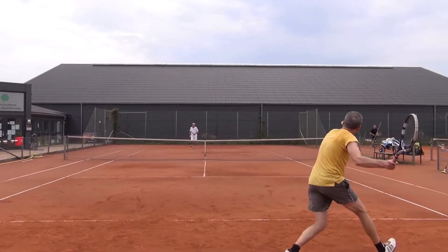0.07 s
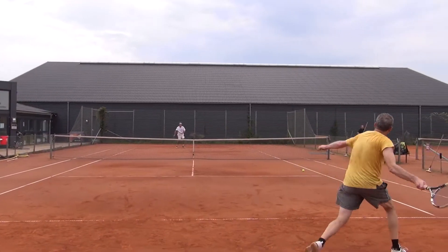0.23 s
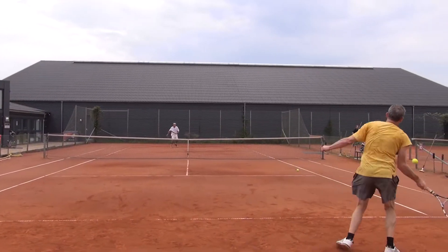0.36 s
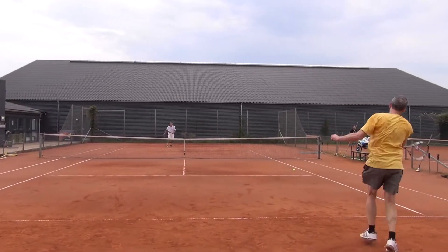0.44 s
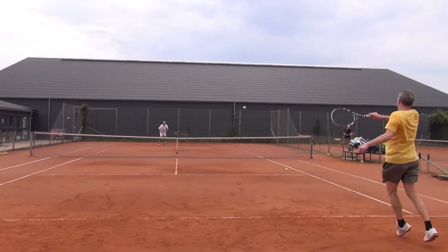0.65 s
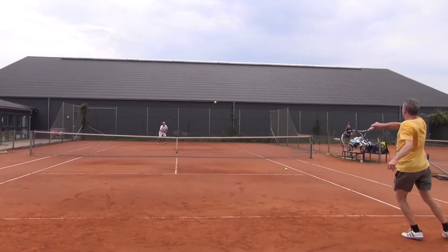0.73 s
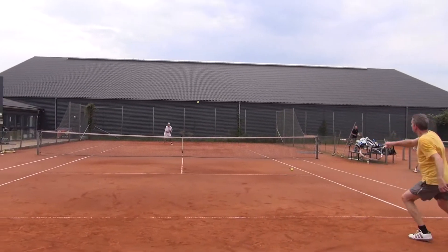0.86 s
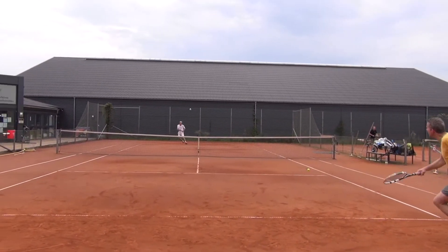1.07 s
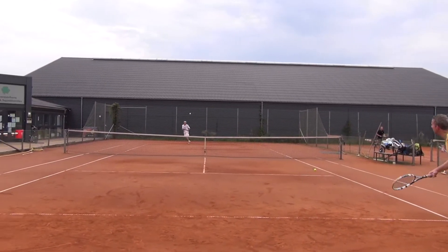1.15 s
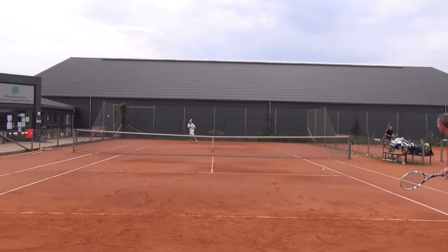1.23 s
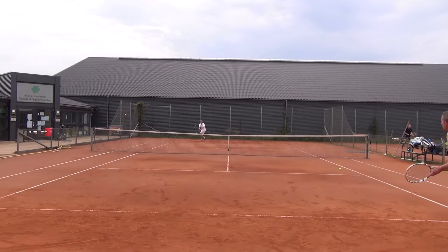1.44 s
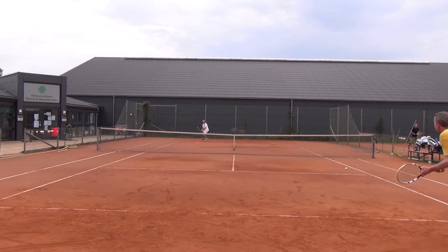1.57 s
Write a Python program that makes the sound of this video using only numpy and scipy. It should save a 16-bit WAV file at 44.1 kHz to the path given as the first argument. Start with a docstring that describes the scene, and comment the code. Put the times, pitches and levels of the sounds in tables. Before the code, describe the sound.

A tennis ball is hit with a sharp close racket pop, shoes sliding on clay, then fainter pops

```python
"""Sharp tennis-ball pops, one close by and others weaker, over thuds, gritty slides and a soft outdoor wash.
Each pop sums a noise crack, a thump, racket modes and, a moment later, the ball's air modes.
Shoes and ball knock on the clay as short hollow tones; slides are dense random grains of fine and coarse grit.
Fences and buildings scatter all of these back as a decaying tail. The image is almost mono."""
import sys
import numpy as np
from scipy import signal
from scipy.fft import rfft, irfft
from scipy.io import wavfile
from scipy.ndimage import uniform_filter1d

SR = 44100
rng = np.random.default_rng(int(sys.argv[2]) if len(sys.argv) > 2 else 0)


def master_out(mix):
    """Clip the mix to full scale and print it as 16-bit PCM to the path in sys.argv[1]."""
    frames = np.transpose(np.atleast_2d(mix))
    ceiling = np.clip(frames, -1, 1)
    pcm = np.round(ceiling * 32767).astype(np.int16)
    wavfile.write(sys.argv[1], SR, pcm)


N = 70560  # samples, 1.6 s


def gain_of(db):
    """Converts decibels to an amplitude ratio by the 20 log law."""
    return 10 ** (np.asarray(db) / 20)


def evened(x):
    """Normalises signal power: scales to rms 1."""
    return x / np.sqrt(np.mean(x ** 2) + 1e-20)


def read(points, hz):
    """Interpolates a table along log frequency, roughly the ear's own pitch scale."""
    f, value = np.transpose(points)
    return np.interp(np.log(hz + 1), np.log(f + 1), value)


def coloured(x, points):
    """Linear filtering: multiplies the spectrum by a table of dB over frequency, leaving phase alone."""
    hz = np.fft.rfftfreq(len(x), 1 / SR)
    return irfft(rfft(x) * gain_of(read(points, hz)), len(x))


def add(mix, start_s, sound):
    """Superposition: adds a sound into the mix at its start time."""
    part = mix[round(start_s * SR):][:len(sound)]
    part += sound[:len(part)]


def wash():
    """Distant traffic and air: many incoherent sources add up to noise, here with drifting spectral patches."""
    # spectrum of the wash: hz, relative density_db (per Hz)
    wash_spectrum = [(24, -38), (40, 4), (256, -2.5), (345, -4.5), (516, -4.5), (733, -1.5), (1070, -5),
                     (1810, -10), (2000, -10.5), (2840, -13.5), (4130, -16), (4460, -16.5), (16000, -31)]
    level_db, patch_db = -42, 2.0  # rms of the wash, rms of its patches
    frames, hz = N // 256 + 5, np.fft.rfftfreq(1024, 1 / SR)
    real, imaginary, patches = rng.standard_normal((frames, 513, 3)).T
    # smoothed over frequency, then over time
    patches = uniform_filter1d(patches, size=12, axis=0)
    patches = evened(uniform_filter1d(patches, size=12, axis=1))
    density_db = read(wash_spectrum, hz)[:, None] + patch_db * patches
    spectrum = (real + 1j * imaginary) * gain_of(density_db)
    noise = signal.istft(spectrum, nperseg=1024, noverlap=768)[1][:N]
    return gain_of(level_db) * evened(noise)


def bloom(t, hz, width_s):
    """A mode driven by a brief contact: it swells, peaks at twice the width, then dies exponentially."""
    u = t / width_s
    return (u / 2) ** 2 * np.exp(2 - u) * np.sin(2 * np.pi * hz * t)


def crack(t, t60_s):
    """Impact noise: an abrupt contact excites a broad band, which rises fast and decays exponentially."""
    # spectrum of the contact noise: hz, relative density_db (per Hz)
    crack_spectrum = [(500, -52), (1200, 8), (1700, 4), (2500, -17), (3000, 9.5), (3700, -7), (4300, 1),
                      (5100, -22), (6000, -2.5), (6900, -15), (7900, -5), (9800, -7), (11000, -17),
                      (14000, -20), (16000, -23)]
    rise_s = .0009
    noise = evened(coloured(rng.standard_normal(len(t)), crack_spectrum))
    rise = (1 - np.exp(-t / rise_s)) ** 2
    return noise * rise * gain_of(-60 * t / t60_s)


def knock(level_db, hz, width_s, thud_hz, thud_db, tick_db):
    """A soft impact on clay: damped modes give a hollow note over a lower thud, contact noise a tick."""
    t = np.arange(round(.15 * SR)) / SR
    note = bloom(t, hz, width_s)
    thud = gain_of(thud_db) * bloom(t, thud_hz, 0.66 * width_s)
    tick = gain_of(tick_db) * crack(t, t60_s=.014)
    return gain_of(level_db) * (note + thud + tick)


def slides():
    """Granular friction: a sliding shoe gives dense, clumped grains of uneven size, from fine to coarse grit."""
    # one table for each slide: time_s, level_db, dullness (0 fine grit, 1 coarse grit)
    slide_paths = [
        [(.187, -76, .2), (.191, -43, 0), (.215, -45.5, 0), (.22, -35.5, 0.01), (.236, -44, 0.3),
         (.245, -30.5, 0.3), (.255, -43.5, 0), (.278, -32.5, 0.06), (.309, -39, 0.16), (.322, -33.5, 0.05),
         (.408, -32.5, 0.13), (.418, -38, 0.3), (.428, -33, 0.7), (.441, -47.5, 0.27), (.47, -34.5, 0),
         (.53, -38.5, 0.9), (.57, -41.5, 0.54)],
        [(.72, -47, .5), (.758, -39, 0.4), (.816, -48, 0.44), (.836, -46, 0.78), (.841, -34, 0),
         (.87, -30.5, 0.43), (.89, -41, 0.48), (.91, -34, 0.78), (.94, -39.5, 0.67), (.99, -46, .8),
         (1.002, -41, .5), (1.014, -40, 0.83), (1.045, -78, 0.6)],
        [(1.05, -75, 0.8), (1.14, -49, 0.75), (1.2, -58, 1), (1.209, -43, 0.15), (1.273, -43, 0.33),
         (1.322, -48, 0.4), (1.35, -49, 0.9), (1.366, -42, 1), (1.4, -54, 0.7), (1.445, -58, 0.8),
         (1.461, -41.5, 0.84), (1.488, -47, 0.3), (1.501, -31.5, 0.73), (1.516, -40, 1), (1.521, -43.5, 0.9),
         (1.545, -44, 0.5), (1.57, -57, 1), (1.6, -51, 1)],
    ]
    # gain reached at 11.5 kHz and above, one for each slide: gain_db
    slide_air_db = [-1, -8, -6.5]
    # spectra of fine and coarse grit: hz, relative density_db (per Hz)
    fine_spectrum = [(59, -49), (100, -6), (239, -26), (308, -9), (481, -42), (676, 3), (854, -7.5),
                     (2080, -3), (2420, -7), (3400, -2), (4570, -13), (5080, -3), (7450, -10.5),
                     (12400, -7.5), (16000, -17.5)]
    coarse_spectrum = [(60, -40), (100, -11.5), (400, -3.5), (660, 0), (1480, 0.5), (3000, -5.5),
                       (5000, -5.5), (7600, -30), (8800, -13), (9300, -10), (9800, -29), (12000, -42),
                       (16000, -34)]
    grains_per_s, spread_db = 18000, 1.6
    clump_s, clump_db = .003, .8

    t, out = np.arange(N) / SR, np.zeros(N)
    clumps = evened(uniform_filter1d(rng.standard_normal((2, N)), size=round(clump_s * SR)))
    unevenness = np.minimum(rng.exponential(1, (2, N)), 5)
    size = gain_of(spread_db * unevenness + clump_db * clumps)
    struck = rng.random((2, N)) < grains_per_s / SR
    grains = size * struck * rng.standard_normal((2, N))

    # both grits are brought to equal strength in this band
    band = signal.butter(2, [2500, 12000], "bandpass", fs=SR, output="sos")
    fine = coloured(grains[0], fine_spectrum)
    fine = fine / np.std(signal.sosfilt(band, fine))
    coarse = coloured(grains[1], coarse_spectrum)
    coarse = coarse / np.std(signal.sosfilt(band, coarse))

    for path, air_db in zip(slide_paths, slide_air_db):
        time_s, level_db, dullness = np.transpose(path)
        share = np.clip(np.interp(t, time_s, dullness), 0, 1)
        grit = np.sqrt(1 - share) * fine + np.sqrt(share) * coarse  # equal-power blend
        slide = gain_of(np.interp(t, time_s, level_db, -120, -120)) * grit
        out += coloured(slide, [(10000, 0.0061), (11500, air_db)])
    return out


def ring(t, hz, t60_s):
    """A struck mode: a sinusoid with a short onset and exponential decay."""
    onset = np.minimum(t / .0012, 1)
    return gain_of(-60 * t / t60_s) * onset * np.sin(2 * np.pi * hz * t)


def pop(level_db, hz, lag_s, crack_db, thump_db, upper_db, frame_db):
    """Modal superposition: crack, thump and racket modes at contact, then the lagging air modes of the ball."""
    # modes of strings and frame: hz, level_db, t60_s (of the mode alone, before the grip)
    frame_modes = [(547, -21, .9), (872, -22, .25), (1104, -27, .17), (1459, -22, .3), (1615, -18, .25),
                   (1820, -12, .07), (2336, -22, .085), (2923, -26, .04), (3445, -30, .2), (4942, -32, .1)]
    # short modes in the crack: hz, level_db
    snap_modes = [(2600, -8), (3650, -3), (4150, -9), (5000, -3.5), (5450, -7.5), (6900, -10.5),
                  (9900, -9.5)]
    bloom_s, snap_bloom_s = .0019, .0009
    side_ratio, side_db = 0.767, -2  # a lower partner of the ball's air mode
    snap_db = -3
    grip_s = .07  # the hand chokes the racket's ring after about this long

    t = np.arange(round(.5 * SR)) / SR
    late = np.maximum(t - lag_s, 0)
    ball = bloom(late, hz, bloom_s)
    ball = ball + gain_of(side_db) * bloom(late, hz * side_ratio, 0.71 * bloom_s)
    snap = crack(t, t60_s=.024)
    for mode_hz, mode_db in snap_modes:
        snap = snap + gain_of(snap_db + mode_db) * bloom(t, mode_hz, snap_bloom_s)
    frame = sum(gain_of(mode_db) * ring(t, mode_hz, t60_s) for mode_hz, mode_db, t60_s in frame_modes)
    frame = frame * np.exp(-(t / grip_s) ** 4)
    thump = bloom(t, 250, width_s=.002)
    upper = bloom(t, 1825, width_s=.0023)
    return gain_of(level_db) * (ball + gain_of(crack_db) * snap + gain_of(thump_db) * thump
                                + gain_of(upper_db) * upper + gain_of(frame_db) * frame)


def late_ring():
    """Modal decay: one late return of the racket's upper mode, with its start time."""
    # the return: start_s, level_db, pitch_hz, t60_s
    upper_return = (.5495, -31, 1862, .14)
    start_s, level_db, hz, t60_s = upper_return
    t = np.arange(round(.2 * SR)) / SR
    return start_s, gain_of(level_db) * ring(t, hz, t60_s)


def court(x):
    """Reverberation: fences and buildings scatter sound back, each band decaying at its own rate."""
    # decay of the returns: hz, t60_s
    court_decay = [(150, 0.35), (500, 0.65), (1000, 1), (1800, 0.24), (3000, 0.5), (5000, 0.18),
                   (12000, 0.3)]
    # colour of the returns at the start: hz, relative level_db
    court_colour = [(100, -18), (300, 16), (550, -4.5), (850, -6.5), (1200, 4), (1800, 3), (2600, 4.5),
                    (5000, 5), (12000, 4)]
    taps = np.zeros(SR)
    slots = np.arange(400, SR - 20, 20)  # samples; one reflection of random sign falls in each slot
    taps[slots + rng.integers(0, 20, len(slots))] = rng.choice([-1., 1.], len(slots))
    hz, t, spectrum = signal.stft(taps, SR, nperseg=256)
    decay_db = -60 * t / read(court_decay, hz)[:, None]
    colour_db = read(court_colour, hz)[:, None]
    tail = signal.istft(spectrum * gain_of(colour_db + decay_db), SR, nperseg=256)[1]
    return signal.fftconvolve(x, tail / np.linalg.norm(tail))[:N]


def scene():
    """Superposes direct sounds and their reverberation; a faint mid-side difference gives a trace of width."""
    # dull knocks of shoes and ball on the clay:
    # start_s, level_db, pitch_hz, bloom_s, thud_hz, thud_db, tick_db (last two relative to the note)
    knock_events = [(.113, -36.5, 530, 0.0016, 200, -15, -18), (0.1914, -30.5, 526, 0.001, 222, -1, 3),
                    (0.1977, -35.5, 300, 0.0015, 200, -5, -20), (0.234, -21.5, 555, 0.0018, 192, -2, -28),
                    (0.2411, -26.5, 416, 0.00081, 193, -3, -25), (.257, -40, 653, 0.0057, 250, -26.5, -20),
                    (.308, -29, 670, 0.0013, 250, -1, -20), (.426, -40, 624, 0.0025, 247, -18, -5),
                    (.55, -11.5, 390, .00085, 260, -14, -17), (.61, -34, 513, .0025, 288, 2, 6),
                    (0.6694, -24.5, 563, 0.0015, 273, 1, -24), (.685, -27.5, 600, 0.0014, 300, -6, 0),
                    (0.709, -31.5, 540, 0.0024, 348, -14, -13), (.7285, -22, 560, .0007, 300, -5, -14),
                    (.78, -35.5, 1020, 0.0016, 397, -8, -20), (.839, -36.5, 674, .0015, 260, 2, 15),
                    (1.207, -33.5, 673, 0.0022, 260, 0, 2), (1.523, -30.5, 874, 0.0014, 297, -6, -21)]
    # ball pops, direct or thrown back: start_s, level_db, ball_pitch_hz, ball_lag_s,
    # crack_db, thump_db, upper_mode_db, frame_ring_db (these four relative to the ball)
    pop_events = [(0.4756, -9, 816, 0.0033, 1, -10.5, -5, 5),
                  (0.6678, -22.5, 1018, 0.0024, -11, -3, -24, -1),
                  (1.3279, -14.5, 940, 0.00305, -9, -16.5, -11.5, -21),
                  (1.406, -28, 974, 0.0032, -3, -5.5, -32, -7),
                  (1.4895, -26, 755, 0.00248, -26.5, -9, -12, -11)]
    pop_court_db, knock_court_db, grit_court_db = -11.5, -17.5, -19.5  # sends into the court
    side_db = -50

    pops, knocks = np.zeros((2, N))
    for start_s, *settings in pop_events:
        add(pops, start_s, pop(*settings))
    for start_s, *settings in knock_events:
        add(knocks, start_s, knock(*settings))
    add(knocks, *late_ring())
    grit = slides()
    sent = gain_of(pop_court_db) * pops + gain_of(knock_court_db) * knocks + gain_of(grit_court_db) * grit
    returns = court(sent)
    mid = pops + knocks + grit + wash() + returns
    side = gain_of(side_db) * (court(pops) - pops)
    return np.array([mid + side, mid - side])


def record(dry):
    """The microphone as a band-pass system: a gentle bass cut, then a steep upper band limit."""
    bass_cut_hz, edge_hz = 158, 15800
    bass_cut = signal.butter(2, bass_cut_hz, "highpass", fs=SR, output="sos")
    thin = signal.sosfilt(bass_cut, dry)
    band_limit = signal.firwin(511, edge_hz, window=("kaiser", 9), fs=SR)
    return signal.oaconvolve(thin, band_limit[None], "same")


dry = scene()
out = record(dry)
master_out(out)
```